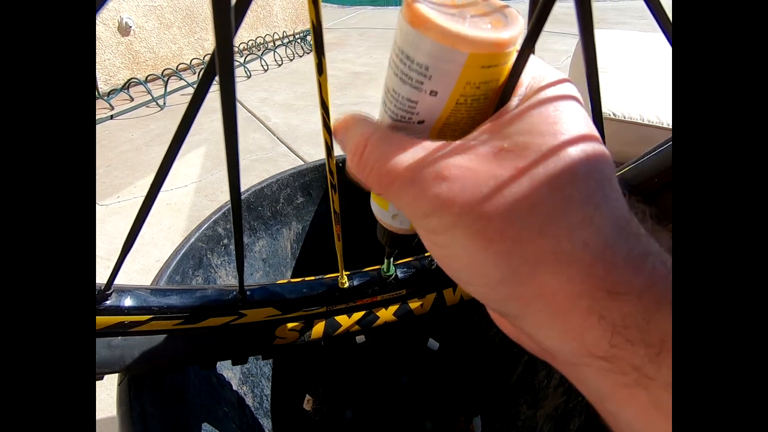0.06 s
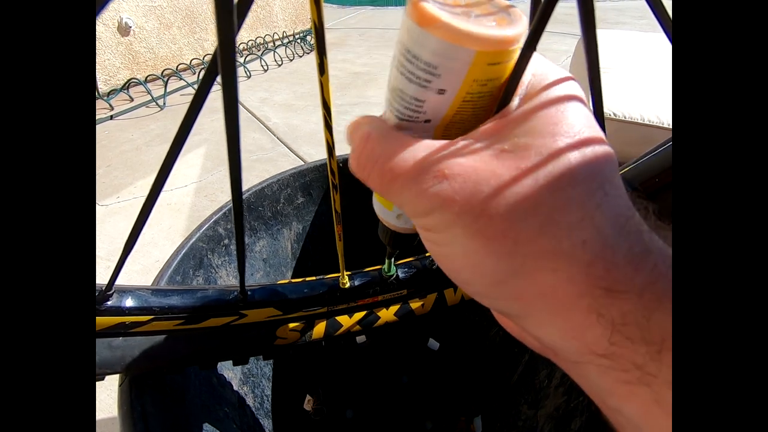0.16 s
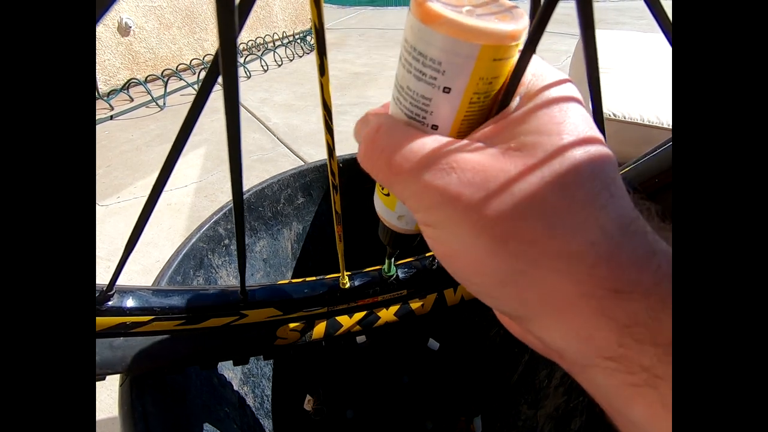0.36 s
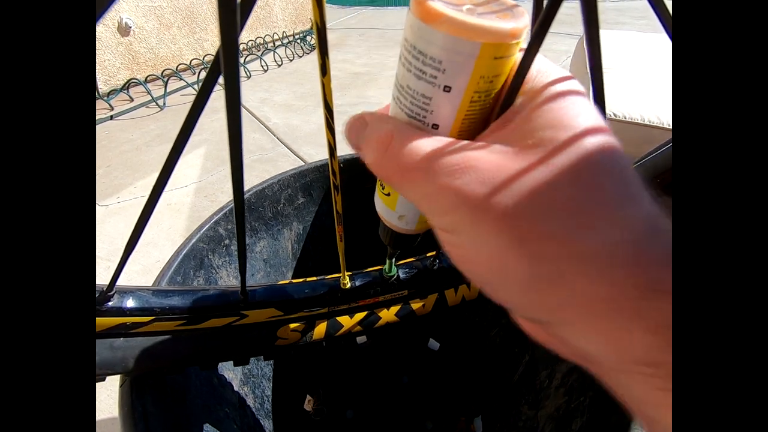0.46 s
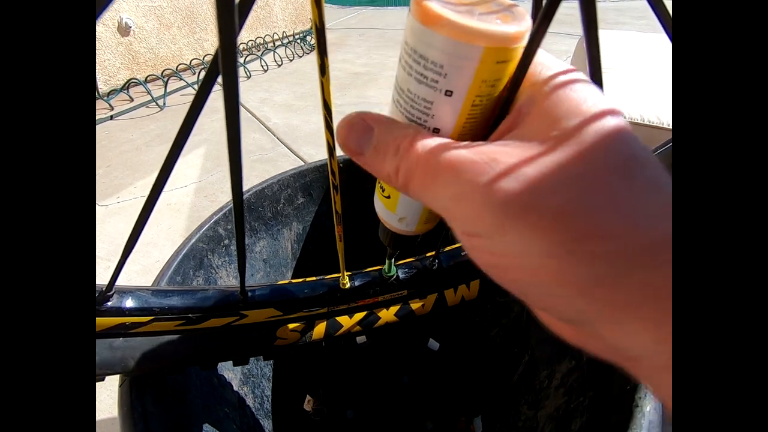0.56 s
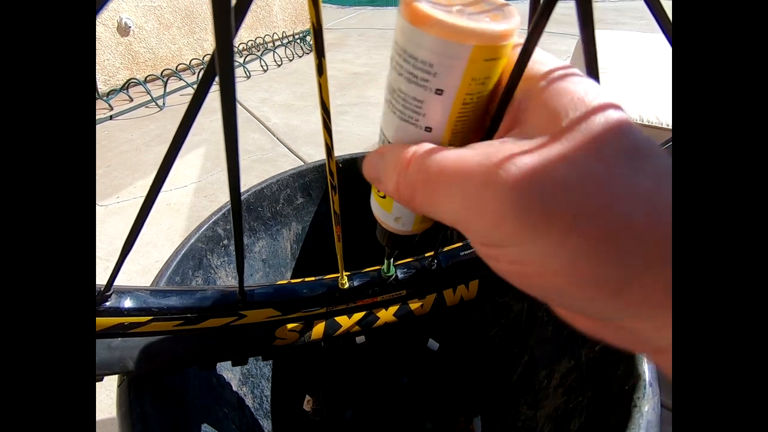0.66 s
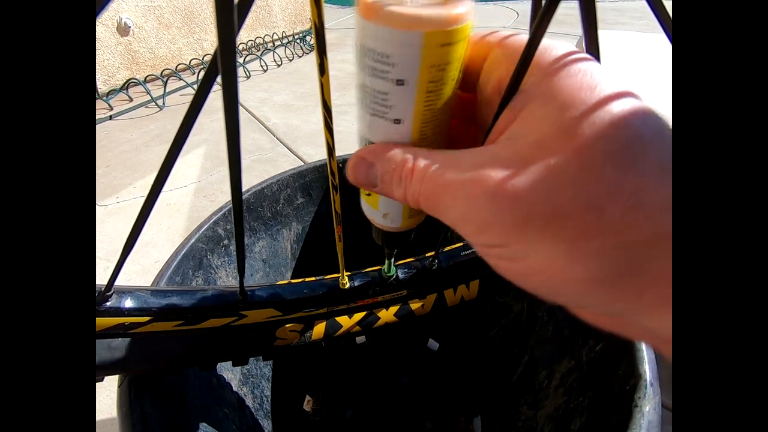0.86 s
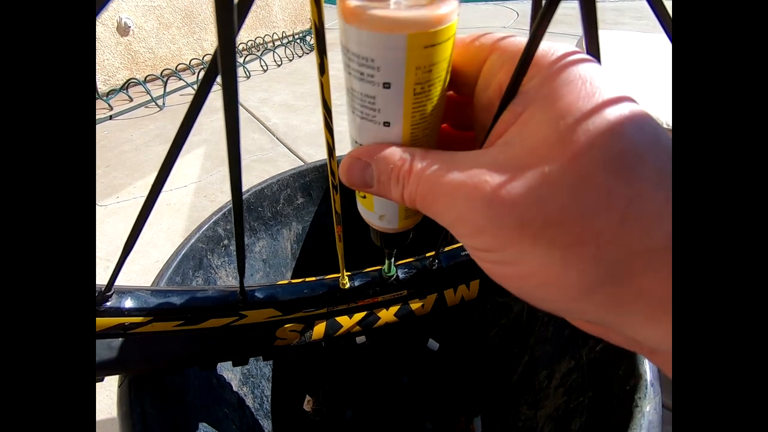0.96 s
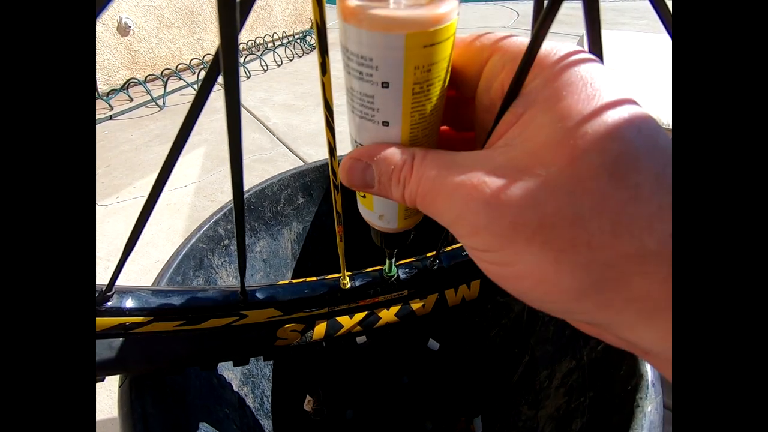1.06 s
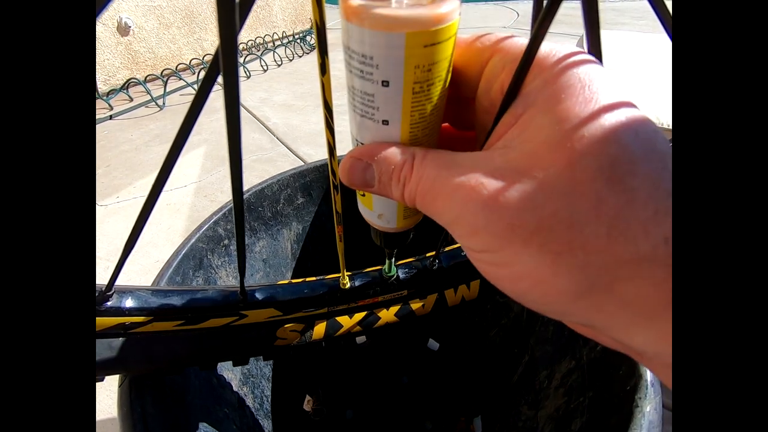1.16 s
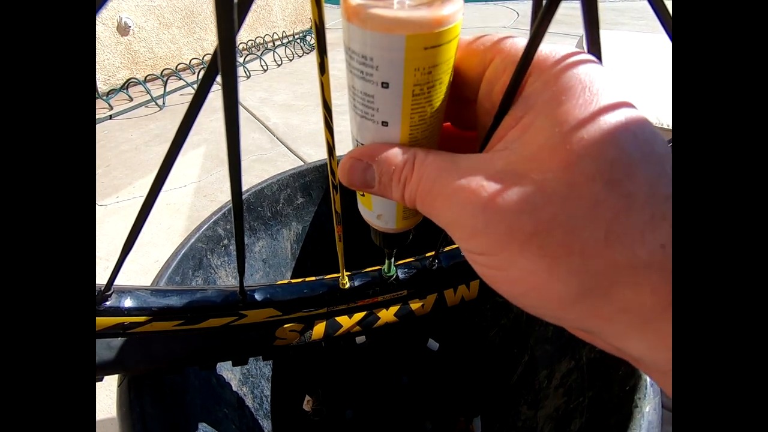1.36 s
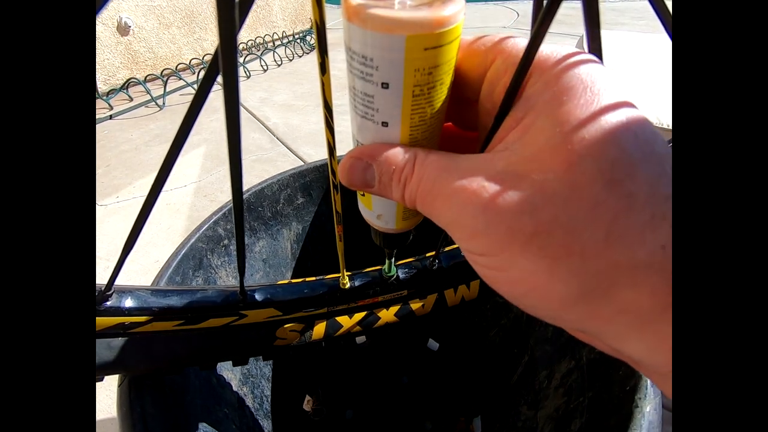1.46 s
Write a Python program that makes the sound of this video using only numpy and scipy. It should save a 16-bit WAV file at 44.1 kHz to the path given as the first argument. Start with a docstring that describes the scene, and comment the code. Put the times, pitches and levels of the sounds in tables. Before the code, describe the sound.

Squeezed plastic bottle cracks sharply and squirts liquid with a quiet, bubbly hiss.

```python
"""Squeezing a bottle into a bicycle valve

Outdoors, fingers rub on a small plastic bottle, its nozzle on the valve of a bicycle wheel. The wall buckles
with sharp snaps, then liquid and air sputter through the nozzle: a hiss and a quick train of bubbles that slows
to single pops. A distant engine hums and fades, and near the end its fourth tone swells again and a faint
whistle is heard."""
import sys
import numpy as np
from scipy import signal
from scipy.fft import rfft, irfft
from scipy.io import wavfile

SR = 44100
rng = np.random.default_rng(int(sys.argv[2]) if len(sys.argv) > 2 else 0)


def store_pcm(level_fs):
    """Save levels as 16-bit WAV."""
    pcm = np.round(np.clip(level_fs, -1, 1) * 32767).astype(np.int16)
    wavfile.write(sys.argv[1], SR, np.atleast_2d(pcm).T)


N = 66150
TIME = np.arange(N) / SR
PITCH_SPREAD, SIZE_SPREAD_DB = 0.048, 3  # how much one bubble differs from the next

# how fast bubbles leave the nozzle: (time [s], rate [bubbles per s])
BUBBLES_PER_S = [(0.35, 264), (0.6, 321), (0.74, 230), (0.86, 225), (0.89, 195)]


def from_db(db):
    """Turn decibels into a number to multiply a sound by."""
    return 10 ** (np.asarray(db) / 20)


def curve(rows, at=TIME, column=1):
    """Read one column of a table, joining its points with straight lines in time."""
    rows = np.array(rows)
    return np.interp(at, rows[:, 0], rows[:, column])


def pan(db):
    """Left and right gains that make the left side louder by db."""
    return from_db(np.array([[db], [-db]]) / 2)


def decay(start, fade_s):
    """Jump to 1 and die away; a fade time is how long a drop of 60 dB takes."""
    age = TIME - start
    return (age >= 0) * np.exp(-np.minimum(np.log(1000) * np.abs(age) / fade_s, 40))


def ring(start, hz, db, fade_s):
    """One pure note that starts suddenly and dies away."""
    return from_db(db) * decay(start, fade_s) * np.sin(2 * np.pi * hz * (TIME - start))


def noise(colour, alike):
    """Stereo noise of strength 1, shaped by a colour table; alike (0 to 1) is how well the sides match."""
    hz, db = np.transpose(colour)
    freqs = np.maximum(np.fft.rfftfreq(N, 1 / SR), 1)
    gain = from_db(np.interp(np.log(freqs), np.log(hz), db))
    gain *= np.minimum(freqs / hz[0], 1) * np.minimum(hz[-1] / freqs, 1) ** 4  # fade past the table's ends
    mid, side = irfft(rfft(rng.standard_normal((2, N))) * gain, N)
    stereo = np.sqrt(1 + alike) * mid + np.sqrt(1 - alike) * side * np.array([[1], [-1]])
    return stereo / stereo.std()


def drift(per_s):
    """A random wobble of size about 1 that heads for a new value per_s times a second."""
    return np.interp(TIME * per_s, np.arange(N), rng.standard_normal(N))


def tone(hz):
    """A pure tone of strength 1 that follows a changing pitch."""
    return np.sqrt(2) * np.sin(2 * np.pi * (np.cumsum(hz) / SR + rng.random()))


def engine(firing_hz=40.25, wander=0.006):
    """A distant engine hums at whole multiples of the rate at which it fires."""
    # the two lower tones: (multiple of the firing rate, base level [dB])
    low_tones = [(2, -53), (3, -50)]
    # how those two swell and fade: (time [s], added level [dB])
    low_swell = [(0, -1.5), (0.2, 1.5), (0.48, 3.5), (0.7, -2.5), (0.85, -10), (1.0, -20), (1.5, -13)]
    # the tones at 4 and 6 times the firing rate: (time [s], fourth's level [dB], sixth's level [dB])
    high_levels = [(0, -51, -51), (0.18, -53.5, -51.5), (0.36, -49, -56), (0.48, -47, -54.5),
                   (0.75, -51, -59.5), (0.9, -57, -66.5), (1.05, -64, -76), (1.5, -74, -70)]
    firing = firing_hz * (1 + wander * drift(8))
    low = sum(from_db(db) * tone(multiple * firing) for multiple, db in low_tones)
    fourth = from_db(curve(high_levels)) * tone(4 * firing)
    sixth = from_db(curve(high_levels, column=2)) * tone(6 * firing)
    return from_db(curve(low_swell)) * low + fourth + sixth


def outdoors():
    """A low rumble and a soft, far hiss lie under everything."""
    # colour of the rumble: (frequency [Hz], relative level [dB])
    rumble_colour = [(20, -31), (45, -10), (80, 0), (110, -4.5), (170, 3.5), (240, -7.5), (320, -5),
                     (420, -20), (600, -52.5)]
    # loudness of the rumble: (time [s], level [dB])
    rumble_level = [(0, -53.5), (0.6, -53.5), (0.9, -54), (1.1, -55), (1.5, -59)]
    # colour of the far hiss: (frequency [Hz], relative level [dB])
    air_colour = [(200, -2.5), (550, -3), (800, 4), (1500, 0), (2200, 5), (3500, -3.5), (5000, -9.5),
                  (6500, -15), (8000, -25), (10500, -28.5), (12500, -38.5), (20000, -47)]
    # loudness of the far hiss: (time [s], level [dB])
    air_level = [(0, -62), (0.15, -60.5), (0.35, -59.5), (1.0, -62), (1.2, -64), (1.42, -63), (1.5, -63.5)]
    rumble = from_db(curve(rumble_level)) * noise(rumble_colour, alike=0.93)
    return rumble + from_db(curve(air_level)) * noise(air_colour, alike=0.17)


def fingers():
    """The grip slides briefly on the plastic."""
    # loudness of the rubbing: (time [s], level [dB])
    level = [(0.03, -76), (0.08, -57.5), (0.092, -58), (0.103, -52.5), (0.125, -72.5), (0.2, -83)]
    # colour of the rubbing: (frequency [Hz], relative level [dB])
    colour = [(400, -5.5), (900, -6), (1450, 0.5), (2200, -13), (3200, -9), (3600, -5), (4600, -17),
              (6300, -10), (7400, -21), (9800, -20), (14000, -44)]
    return from_db(curve(level)) * noise(colour, alike=0.49) * (TIME < level[-1][0])


def wall(start):
    """The wall rings with several notes; neighbours swing opposite ways, and each has its own direction."""
    # the wall's notes: (pitch [Hz], relative level [dB], fade time [s], left over right [dB], left lag [s])
    notes = [(635, -17, .014, 3, .00011), (1190, -2.5, 0.0039, 3.5, .00006), (2250, -6, 0.0065, 0, .00002),
             (3247, -12, 0.0097, -1, 0), (4485, -14, 0.006, 2.5, -.000005),
             (6200, -17, 0.0042, 1.5, -.000015), (7500, -22.5, 0.0054, 2, -.00002),
             (9570, -21, 0.0037, 3, .00001), (11800, -31, .005, 5, -.000015)]
    out = 0
    for k, (hz, db, fade_s, pan_db, lag_s) in enumerate(notes):
        sides = np.array([ring(start + lag_s, hz, db, fade_s), ring(start, hz, db, fade_s)])
        out += (-1) ** (k + 1) * pan(pan_db) * sides
    return out


def thump(start, hz=179, lag_s=0.0023):
    """The wall swings through once, pushing the air, and the whole bottle rings on briefly."""
    # the bottle's low notes: (pitch [Hz], relative level [dB], fade time [s])
    notes = [(168, -15.5, .07), (213, -16, 0.023), (310, -12.5, 0.052)]
    spread = np.minimum((np.pi * hz * (TIME - start - lag_s)) ** 2, 40)
    push = (2 * spread - 1) * np.exp(-spread)  # one dip between two small bumps
    return push - sum(ring(start + lag_s / 2, *note) for note in notes)


def snaps():
    """Each buckle cracks the wall, thumps the bottle and echoes off the wheel and the yard."""
    # the buckles: (time [s], crack gain [dB], treble limit [Hz], thump gain [dB], left over right [dB])
    buckles = [(0.227, -36, 7130, -39, 2), (0.2321, -9, 1500, -19.5, 2.5), (0.2381, -2, 6380, -23, 1.5),
               (0.2711, -28.5, 10000, -34.5, 0), (0.2818, 3, 11940, -9, 0)]
    # colour of the echoes: (frequency [Hz], relative level [dB])
    echo_colour = [(300, 5.5), (600, -3), (1300, -3), (1800, -4), (2700, -2), (4000, -10), (6500, -17),
                   (9000, -26.5), (14000, -38)]
    early, late = noise(echo_colour, alike=0.99), noise(echo_colour, alike=0.55)
    out = 0
    for start, crack_db, treble_hz, thump_db, pan_db in buckles:
        echoes = from_db(-19.5) * early * decay(start, fade_s=0.028)
        echoes += from_db(-37.5) * late * decay(start, fade_s=0.11)
        soften = signal.butter(4, treble_hz, fs=SR, output="sos")
        crack = signal.sosfilt(soften, wall(start) * pan(pan_db) + echoes)
        out += from_db(crack_db) * crack + from_db(thump_db) * thump(start)
    return out


def bubble_train(until_s, hz=3306, fade_s=0.0073, gap_spread=0.064):
    """Bubbles leave the nozzle almost evenly: (time [s], level [dB], pitch [Hz], fade time [s])."""
    # typical strength of a bubble: (time [s], level [dB])
    level = [(0.35, -56), (0.43, -60), (0.447, -32), (0.48, -47), (0.535, -38.5), (0.56, -31.5),
             (0.585, -44), (0.612, -32), (0.64, -48), (0.675, -43), (0.695, -29.5), (0.76, -43),
             (0.785, -31.5), (0.86, -43), (0.905, -39)]
    bubbles, start = [], BUBBLES_PER_S[0][0]
    for gap, size, pitch in rng.standard_normal(size=(300, 3)):
        if start > until_s - 1 / BUBBLES_PER_S[-1][1]:
            break
        db = curve(level, start) + SIZE_SPREAD_DB * size
        bubbles.append((start, db, hz * np.exp(PITCH_SPREAD * pitch), fade_s))
        start += np.exp(gap_spread * gap) / curve(BUBBLES_PER_S, start)
    return bubbles


def froth(count=5, spread_s=0.0051, fade_s=0.006):
    """Each spit is a cluster of small bubbles: (time [s], level [dB], pitch [Hz], fade time [s])."""
    # the middle of each cluster: (time [s], level [dB], pitch [Hz])
    spits = [(0.37, -47, 5860), (0.378, -51, 3950), (0.406, -41, 4700), (0.415, -42, 2700),
             (0.438, -38.5, 6050), (0.45, -34, 3800), (0.456, -42, 6100), (0.508, -40.5, 5460),
             (0.558, -38.5, 4430), (0.615, -55, 5440), (0.681, -53, 5430)]
    return [(start + spread_s * when, db + SIZE_SPREAD_DB * size, hz * np.exp(PITCH_SPREAD * pitch), fade_s)
            for start, db, hz in spits for when, size, pitch in rng.standard_normal(size=(count, 3))]


def squirt(attack_s=0.0006, rise_per_s=5, spray_fade_s=0.0055, gush_s=0.0021, pulsing=0.55):
    """Each bubble bursts and rings with rising pitch; the hiss and the hollow bottle throb in step."""
    # the last single pops: (time [s], level [dB], pitch [Hz], fade time [s])
    pops = [(0.8945, -40, 3197, 0.0081), (0.8995, -42, 3580, 0.0092), (0.9045, -38, 3450, 0.009),
            (0.9102, -33, 3500, .009), (0.9175, -32, 3520, .009), (0.9255, -37.5, 3310, .015),
            (0.9377, -37.5, 3250, .018), (0.9533, -37, 3250, 0.014), (0.9655, -44, 2920, 0.02),
            (0.977, -44, 2910, 0.026), (0.9932, -49, 4740, 0.023)]
    # hiss of the flow through the nozzle: (time [s], level before throbbing [dB])
    flow_level = [(0.34, -78), (0.372, -58.5), (0.425, -58.5), (0.447, -53.5), (0.485, -56.5),
                  (0.56, -56.5), (0.65, -58.5), (0.76, -55.5), (0.85, -61.5), (0.95, -59.5), (1.0, -62),
                  (1.06, -110)]
    # colour of that hiss: (frequency [Hz], relative level [dB])
    hiss_colour = [(600, -24.5), (800, -11), (1700, -13), (2400, 2), (3900, 2), (5000, -8), (6200, -7),
                   (7500, -19), (9800, -14), (11500, -29.5), (13500, -24), (15000, -43.5)]
    # the hollow bottle sounding along with the flow: (time [s], level before throbbing [dB])
    hollow_level = [(0.35, -63), (0.42, -60.5), (0.58, -54), (0.68, -58.5), (0.78, -57.5), (0.87, -69),
                    (1.0, -76)]
    # colour of the hollow sound: (frequency [Hz], relative level [dB])
    hollow_colour = [(600, -37.5), (770, -7.5), (950, -15.5), (1230, 3.5), (1480, 0.5), (1750, -18.5),
                     (2600, -43)]
    first_pop_s = pops[0][0]
    age = TIME[:1500]  # the life of one bubble
    swell = 1 - np.exp(-(age / attack_s) ** 2)
    rings, spray, gush = np.zeros((3, N))
    for start, db, hz, fade_s in bubble_train(first_pop_s) + froth() + list(pops):
        span = slice(int(start * SR), int(start * SR) + len(age))
        phase = 2 * np.pi * hz * age * (1 + rise_per_s * age / 2)
        rings[span] += from_db(db) * swell * np.exp(-np.log(1000) * age / fade_s) * np.sin(phase)
        spray_db = -15 if start >= first_pop_s else -21.5  # single pops spray more
        spray[span] += from_db(db + spray_db) * swell * np.exp(-np.log(1000) * age / spray_fade_s)
        gush[span] += np.exp(-age / gush_s) / (gush_s * curve(BUBBLES_PER_S, start))
    throb = 1 - pulsing + pulsing * gush
    hiss = (from_db(curve(flow_level)) * throb + spray) * noise(hiss_colour, alike=0.63)
    hollow = from_db(curve(hollow_level)) * throb * noise(hollow_colour, alike=0.58)
    return (rings + hiss) * pan(db=2) + hollow * pan(db=5.5)


def late_hum(hz=166, waver=0.015):
    """The engine's tone at four times its firing rate swells again near the end, wavering."""
    # loudness of the hum: (time [s], level [dB])
    level = [(1.0, -79.5), (1.12, -59.5), (1.27, -69.5), (1.42, -56.5), (1.47, -48.5), (1.5, -49)]
    return from_db(curve(level)) * tone(hz * (1 + waver * drift(19)))


def whistle(lower_hz=2540, flicker_db=3):
    """Two faint whistling tones flicker, the upper one rising in pitch."""
    # path of the upper tone: (time [s], pitch [Hz], level [dB])
    path = [(1.32, 3450, -91), (1.355, 3570, -64.5), (1.39, 3840, -70.5), (1.42, 3920, -70),
            (1.47, 3780, -83)]
    upper = tone(curve(path) * (1 + 0.02 * drift(400)))
    lower = from_db(-7.5) * tone(lower_hz * (1 + 0.03 * drift(360)))
    loudness = from_db(curve(path, column=2) + flicker_db * drift(150))
    return (upper + lower) * loudness * (TIME > path[0][0])


def scene():
    """The bottle close by, the yard around it."""
    return snaps() + squirt() + fingers() + whistle() + engine() + late_hum() + outdoors()


def record(dry, bass_hz=28, treble_hz=12800, top_hz=20000):
    """Deep bass is lost, the loudest snap overloads, the high treble softens and the very top is cut."""
    cut_bass = signal.butter(2, bass_hz, "high", fs=SR, output="sos")
    soften_treble = signal.butter(6, treble_hz, fs=SR, output="sos")
    cut_top = signal.cheby2(12, 70, top_hz, fs=SR, output="sos")
    clipped = np.clip(signal.sosfilt(cut_bass, dry), -1, 1)
    return signal.sosfilt(cut_top, signal.sosfilt(soften_treble, clipped))


dry = scene()
out = record(dry)
store_pcm(out)
```